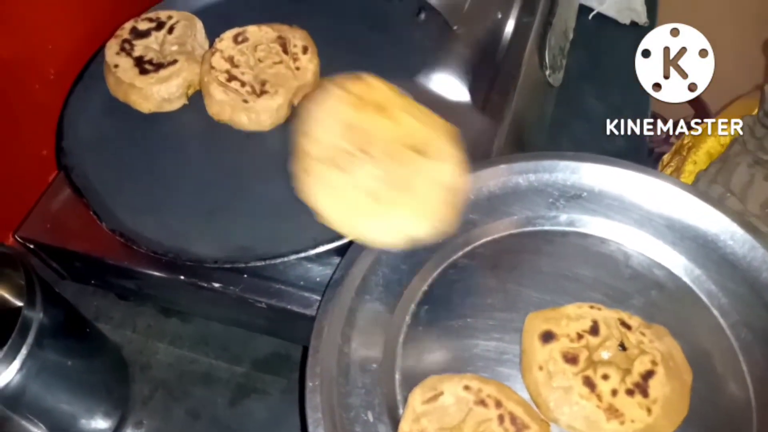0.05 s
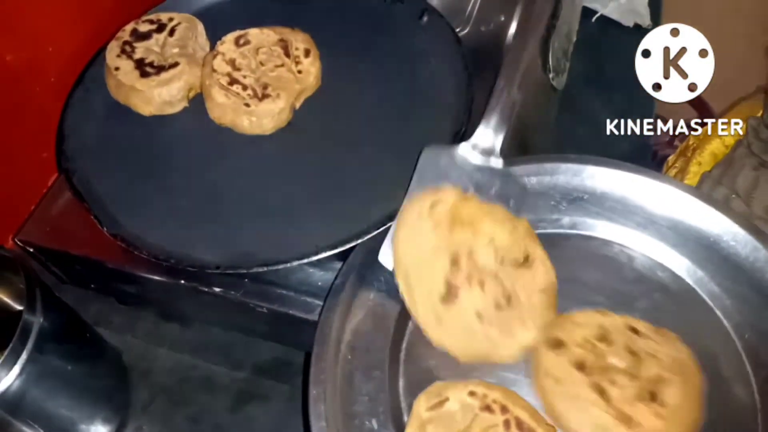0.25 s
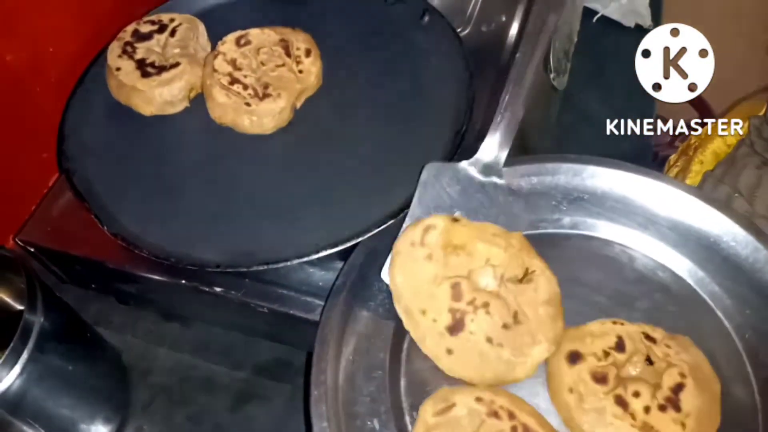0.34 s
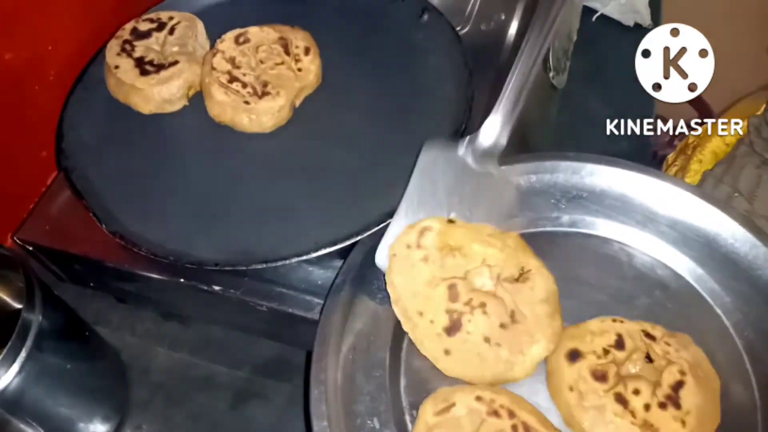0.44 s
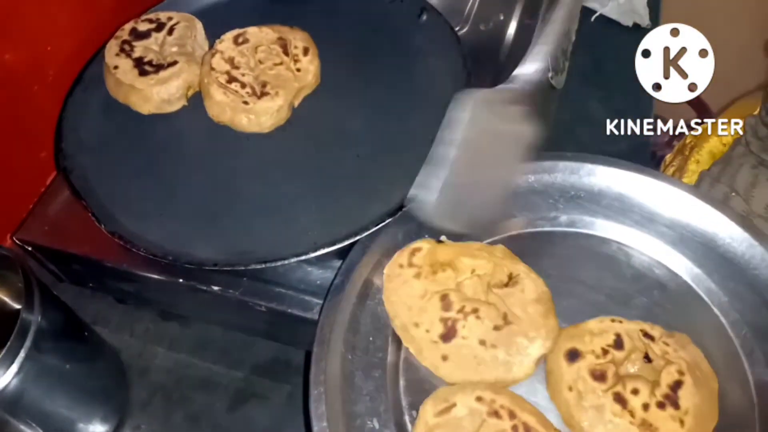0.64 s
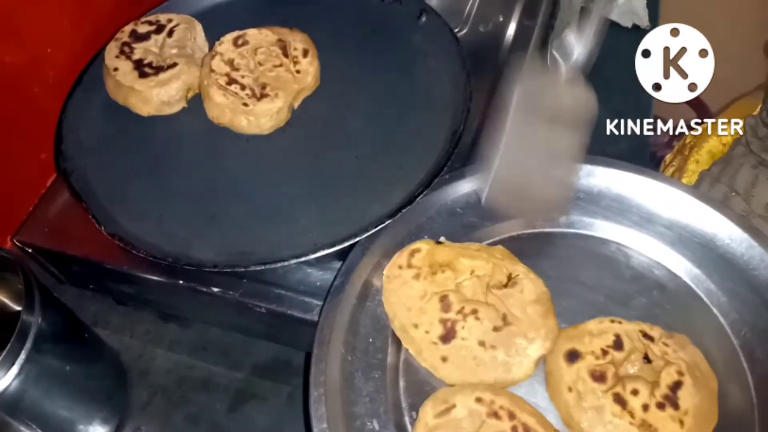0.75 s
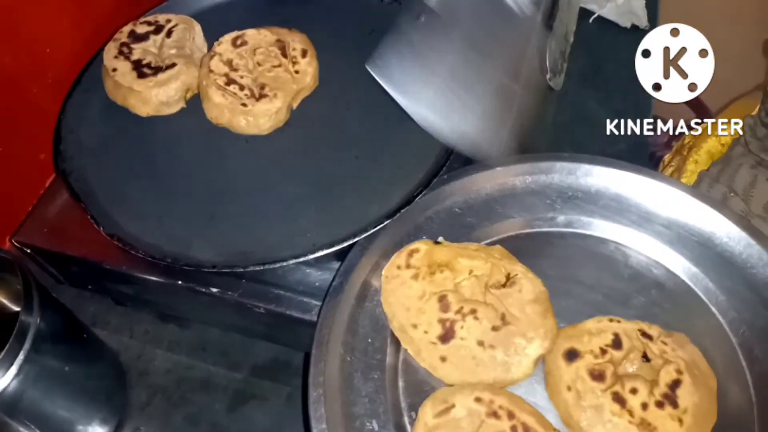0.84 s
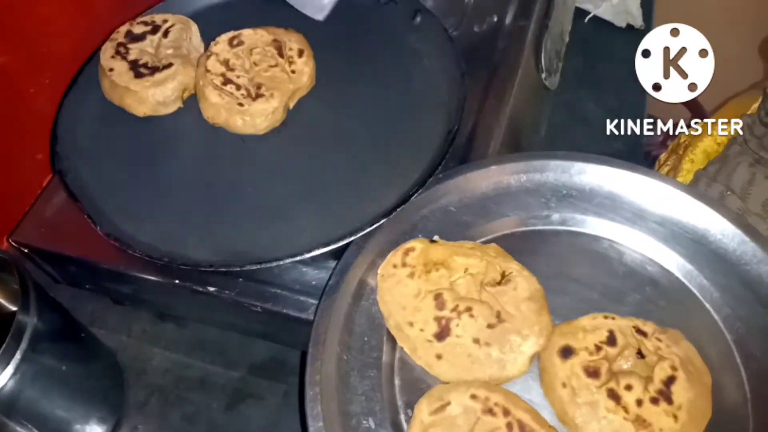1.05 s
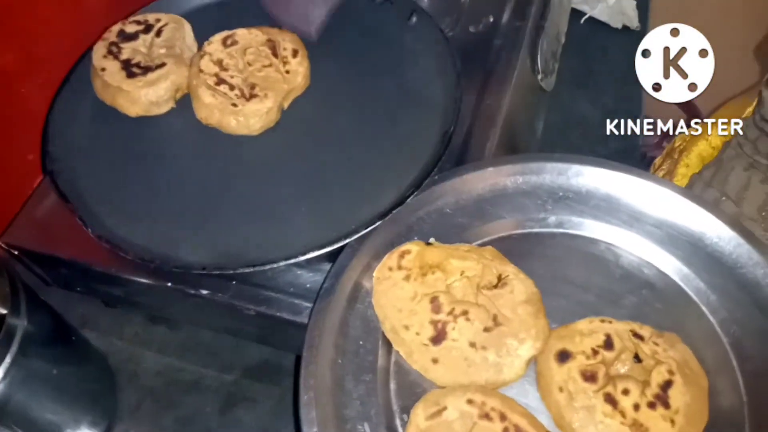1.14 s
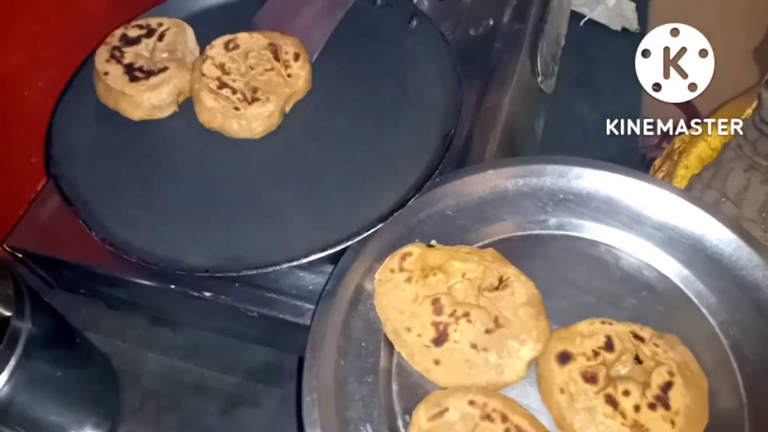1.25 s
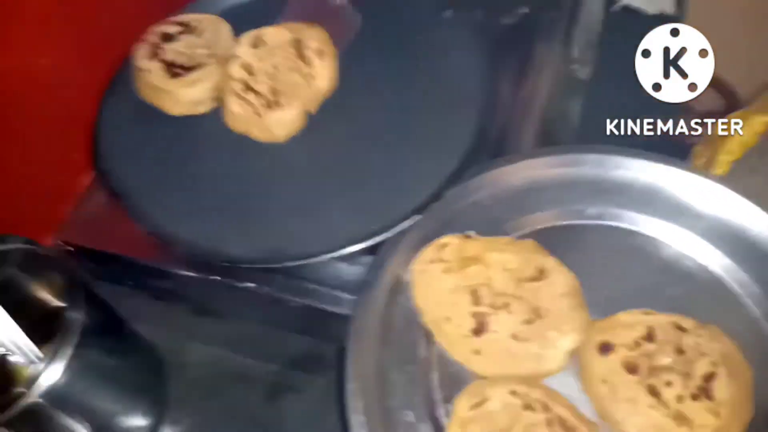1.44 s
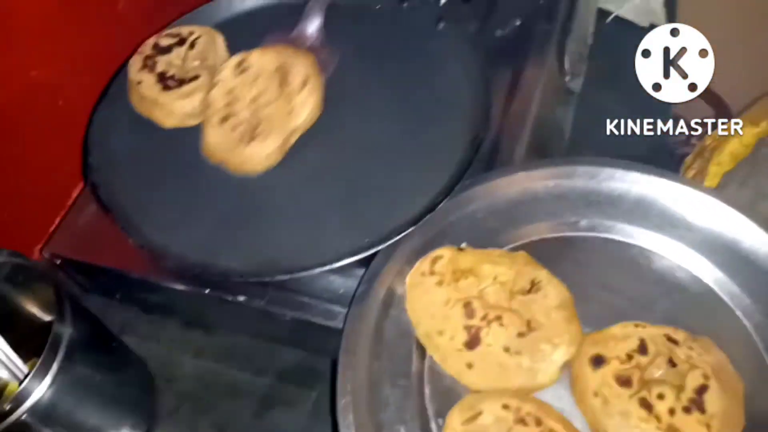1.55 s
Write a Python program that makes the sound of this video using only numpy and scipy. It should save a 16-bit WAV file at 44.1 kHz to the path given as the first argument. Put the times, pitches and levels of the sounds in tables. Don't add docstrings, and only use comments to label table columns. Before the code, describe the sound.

Close, dry kitchen sound: steel spatula and flatbread hit a thin plate with rapid clacks and small rebounds, low counter thumps beneath, a soft hand brush, then two duller griddle knocks and a short gritty slide.

```python
import sys
import numpy as np
from scipy import signal
from scipy.fft import rfft, irfft
from scipy.io import wavfile

SR = 44100
rng = np.random.default_rng(int(sys.argv[2]) if len(sys.argv) > 2 else 0)


def magnitude_from_level(level_db):
    exponent = np.asarray(level_db, float) / 20
    return 10 ** exponent


def master_out(mix):
    frames = np.transpose(np.atleast_2d(mix))
    ceiling = np.clip(frames, -1, 1)
    pcm = np.round(ceiling * 32767).astype(np.int16)
    wavfile.write(sys.argv[1], SR, pcm)


N = 70560
TIME = np.arange(N) / SR

# start_s [s], peak_db [dB], tilt_db_per_octave [dB], chatter_s [s]
EDGE_HITS = [
    (0.202, -15, 0.31, 0.012),
]
DROP_HITS = [
    (0.232, -16.5, -1, 0.011),
]
BOUNCE_HITS = [
    (0.331, -19.5, 0.084, 0.0062),
    (0.391, -38, 0.1, 0.0042),
]
RIM_HITS = [
    (0.437, -18, 0.076, 0.014),
    (0.491, -31.5, 0.14, 0.0058),
]
BLADE_HITS = [
    (0.615, -22, 0.046, 0.024),
    (0.659, -28.5, 0.14, 0.021),
]
IRON_HITS = [
    (1.244, -21.5, -0.4, 0.018),
]
LAND_HITS = [
    (1.323, -18.5, 0.23, 0.018),
]
# mode_hz [Hz], width_hz [Hz], level_db [dB]
EDGE_MODES = [(420, 47, 1), (1010, 82, -14), (1530, 230, -12.5), (2937, 81, 2), (3490, 79, -7.5),
              (3977, 110, -2), (4610, 185, -3), (5240, 60, -0.5), (6390, 65, 0.5), (6930, 58, -7),
              (8100, 55, -30), (9530, 170, -4)]
DROP_MODES = [(465, 47, -1), (500, 26, -23), (952, 50, -2), (1705, 60, -2.5), (2157, 35, -0.5),
              (2684, 46, -4), (3100, 41, 5), (3930, 37, -10), (4940, 320, -10.5), (6070, 180, -3.5),
              (6770, 72, -3)]
BOUNCE_MODES = [(520, 104, -2), (903, 11, -3), (1790, 37, -9), (2080, 23, -7), (2220, 45, -8),
                (2950, 64, -2), (3760, 64, -1), (4500, 85, -5), (5050, 100, -8), (5620, 76, -7),
                (6960, 49, -27), (7360, 22, -38)]
RIM_MODES = [(591, 46, -1), (725, 32, -2), (1250, 204, -4.5), (2002, 15, -4.5), (2474, 20, -1.5),
             (4060, 78, -5), (4335, 23, 6), (4517, 25, 5), (5480, 74, -2), (6350, 83, -4), (6970, 32, -1),
             (8000, 60, -40), (9600, 23, 0)]
BLADE_MODES = [(713, 22, -12.5), (2265, 33, -3), (2610, 58, -3), (2790, 60, -5), (2920, 67, -5),
               (3487, 23, 1.5), (4400, 70, 2), (5230, 52, 4), (6100, 270, -4.5), (6770, 38, 0),
               (9600, 60, -1.5), (10600, 300, -12.5)]
IRON_MODES = [(510, 43, -2), (987, 30, 2), (1730, 53, -8.5), (2090, 41, -6.5), (3070, 110, -1),
              (3360, 25, -22), (3660, 20, -11), (4500, 15, -27), (4450, 134, -3), (5100, 160, -11.5),
              (5600, 58, -9), (6220, 24, -17)]
LAND_MODES = [(468, 52, 2.5), (602, 107, -7.5), (960, 9.5, 5), (1823, 44, -4), (2075, 20, -5.5),
              (3003, 170, -1.5), (3580, 44, -1), (4540, 110, 1), (4900, 150, -6.5), (5550, 220, -8.5),
              (7130, 114, -7), (8900, 180, -19)]
# freq_hz [Hz], density_db [dB per Hz]
EDGE_WASH = [(120, -49.5), (200, -21.5), (1010, -24.5), (2290, -19), (2900, -5), (9310, -11),
             (15500, -26.5)]
DROP_WASH = [(120, -43), (200, -27.5), (462, -15.5), (769, -1.5), (906, -26), (1170, -1.5), (3010, -6.5),
             (6350, -12.5), (15500, -35.5)]
RIM_WASH = [(120, -59), (200, -18), (399, -48), (479, -24.5), (1840, -22), (2060, -6), (4330, -11.5),
            (4750, -13), (15500, -20.5)]
BLADE_WASH = [(120, -56), (200, -28), (702, -19), (812, -13.5), (2510, -4), (3180, -10.5), (4410, -0.5),
              (12700, -15), (15500, -18.5)]
IRON_WASH = [(120, -43), (200, -8.5), (327, -42), (534, -6.5), (677, -3), (974, -13), (2330, -10.5),
             (4660, -12.5), (15500, -23.5)]
# tail_t60_s, wash_db, modes_db, tail_under_burst_db
EDGE_BODY = (0.16, -7.5, -14, -3.5)
DROP_BODY = (0.33, -14, -14.5, 1.5)
BOUNCE_BODY = (0.33, -10, -13.5, 0)
RIM_BODY = (0.33, -8, -11, -1)
BLADE_BODY = (0.33, -9.5, -13, 0.5)
IRON_BODY = (0.33, -14.5, -12.5, 0)
LAND_BODY = (0.33, -14, -12, -2)
FIRST_TOUCH, MODE_SPREAD_DB, T60_RATIO_PER_OCTAVE, BODY_CUT_HZ = 19, 1, 0.88, 230
SOFT_CONTACT_HZ, FIRM_CONTACT_HZ = 9000, 12000

# start_s [s], pitch_hz [Hz]
THUMP_AT = [(.245, 93), (.352, 94), (.465, 92), (.24, 205), (.335, 207), (.44, 200), (1.25, 208),
            (1.02, 55), (.6, 62), (1.27, 92), (.64, 200)]
# level_db [dB], t60_s [s]
THUMPS = [(-43.5, 0.27), (-46.5, 0.73), (-49.5, 0.41), (-43, 0.12), (-45.5, 0.22), (-52, 0.36),
          (-50.5, 0.55), (-58, 0.29), (-54.5, 0.36), (-61, 0.68), (-53.5, 0.1)]
THUMP_GAIN_DB, THUMP_LONGEST_S, THUMP_RISE_CYCLES = 7, 0.45, 1.74
# start_s [s], damped_s [s], pitch_hz [Hz]
SING_AT = [(.672, .73, 7675), (.67, 1.6, 7942), (1.265, 1.325, 7671), (.66, .92, 4022), (.438, .6, 392),
           (.617, .9, 1319), (.617, .8, 694), (.617, .77, 390), (.62, .85, 1992), (.62, .81, 1010),
           (.335, .43, 3880), (.44, .61, 4340), (1.19, 1.24, 370), (.02, .08, 1340), (0, .2, 7950),
           (.3, .44, 7945), (.47, .54, 11600), (.63, .76, 11620), (.9, .95, 340), (.79, .86, 195),
           (1.246, 1.32, 947), (1.325, 1.42, 953)]
# level_db [dB], t60_s [s]
SINGS = [(-40.5, 0.28), (-61, 4.7), (-49.5, 3.2), (-55, 1.2), (-29.5, 0.29), (-48.5, 0.38), (-49, 0.25),
         (-46.5, 0.24), (-55.5, .6), (-56.5, 0.46), (-53, 0.43), (-46, 0.37), (-70, 2.7), (-71.5, 0.72),
         (-76, 4.1), (-70, 2.1), (-56, .5), (-61, .5), (-72.5, 0.33), (-74.5, 0.56), (-45, 0.7),
         (-51, 0.72)]
SING_RISE_S, SING_DAMP_S = 0.0028, 0.014

# time_s [s], level_db [dB]
SLIDE_LEVEL = [(1.37, -45.5), (1.42, -47), (1.445, -43.5), (1.5, -47), (1.55, -46.5), (1.575, -43.5),
               (1.64, -50)]
# freq_hz [Hz], level_db [dB]
SLIDE_COLOUR = [(350, -45), (600, -19.5), (2000, -14.5), (5000, -17), (9000, -26.5), (15500, -30.5)]
# mode_hz [Hz], width_hz [Hz], level_db [dB]
SLIDE_MODES = [(534.5, 53, 1.5), (970, 53, -3), (1910, 41, -15), (2675, 74, -11.5), (4000, 22, -28),
               (4526, 54, -6), (4900, 43, -9), (5550, 36, -16), (5840, 55, -15.5), (6600, 57, -29),
               (6810, 44, -9), (7060, 42, -9.5)]
SLIDE_GRAINS_PER_S, SLIDE_MODES_DB = 7000, 7
# time_s [s], level_db [dB]
LIFT_LEVEL = [(0, -74), (.045, -64), (.075, -62), (.12, -66), (.18, -73)]
# mode_hz [Hz], width_hz [Hz], level_db [dB]
LIFT_MODES = [(612, 19, 6), (510, 33, -4), (1280, 740, -18)]
# freq_hz [Hz], density_db [dB per Hz]
SWISH_COLOUR = [(88, -48), (150, -20), (347, -10), (760, -30), (1120, -27), (4500, -26), (5850, -39),
                (9900, -120)]
SWISH_S, SWISH_RISE_S, SWISH_T60_S, SWISH_DB = 0.978, 0.021, 0.25, -52
# start_s [s], peak_db [dB]
SPITS = [
    (1.3915, -28.5),
    (1.4226, -29),
]
# freq_hz [Hz], level_db [dB]
SIZZLE_COLOUR = [(30, -11), (61, -1), (200, -17.5), (450, -25), (1300, -24), (2300, -13.5), (3000, -12),
                 (3940, -6.5), (7780, -8.5), (15800, -24.5)]
SPIT_CUT_HZ, SPIT_DECAY_S, SIZZLE_DB = 11000, 0.0004, -60
# time_s [s], pitch_hz [Hz]
JET_PITCH = [(0, 10200), (.2, 10180), (.42, 9800), (.8, 9600), (1.3, 9350), (1.6, 9680)]
JET_DB, JET_WOBBLE_HZ, JET_FLICKER_DB = -65.5, 50, 2.5
# freq_hz [Hz], gain_db [dB]
MIC = [(40, -6.5), (90, -4.5), (11500, -0.29), (13000, -14), (14200, -7.5), (15000, 2), (15620, -11),
       (15720, -22)]
MIC_CUTOFF_HZ = 16780


def rms_one(x):
    return x / np.sqrt(np.mean(x ** 2) + 1e-20)


def at_hz(points, hz):
    points_hz, values = np.transpose(points)
    return np.interp(np.log(np.maximum(hz, 1)), np.log(points_hz), values)


def colour(x, spectrum):
    gain = magnitude_from_level(at_hz(spectrum, np.fft.rfftfreq(len(x), 1 / SR)))
    return irfft(rfft(x) * gain, len(x))


def high_pass(x, cut_hz):
    return signal.sosfilt(signal.butter(2, cut_hz, "high", fs=SR, output="sos"), x)


def drift(rate_hz):
    r = np.exp(-2 * np.pi * rate_hz / SR)
    return rms_one(signal.lfilter([1], [1, -2 * r, r * r], rng.standard_normal(2 * N))[N:])


def under(curve):
    s, db = np.transpose(curve)
    edge_s = [s[0] - 0.02, *s, s[-1] + 0.02]
    edge_db = [db[0] - 30, *db, db[-1] - 30]
    return magnitude_from_level(np.interp(TIME, edge_s, edge_db, -150, -150))


def ring(x, hz, t60_s):
    r = magnitude_from_level(-60 / (max(t60_s, 0.002) * SR))
    w = 2 * np.pi * hz / SR
    return signal.lfilter([0, np.sin(w)], [1, -2 * r * np.cos(w), r * r], x + 1e-18)


def resonate(x, modes, extra_db=0.0):
    hz, width_hz, db = np.transpose(modes)
    size = magnitude_from_level(db) * np.sqrt(width_hz)
    size = size / np.sqrt(np.sum(size ** 2))
    gain = size * magnitude_from_level(extra_db) * np.sqrt(4 * np.pi * width_hz / SR)
    out = 0
    for k, (f, width, g) in enumerate(zip(hz, width_hz, gain)):
        out = out + (-1) ** k * g * ring(x, f, 2.2 / width)
    return out


def knocks(hits, modes, wash, body):
    t60_s, wash_db, modes_db, tail_db = body
    t = TIME[:SR // 2]
    out = np.zeros(N + SR)
    octave = np.log2(np.array(modes)[:, 0] / 2000)
    for start_s, peak_db, tilt_db, chatter_s in hits:
        burst = np.exp(-(t / chatter_s) ** 2)
        drive = 0.93 * rng.standard_normal(len(t)) * (burst + magnitude_from_level(tail_db - 60 * t / t60_s))
        drive[0] = FIRST_TOUCH
        spread_db = MODE_SPREAD_DB * rng.standard_normal(len(modes))
        sound = resonate(drive, modes, modes_db + tilt_db * octave + spread_db)
        noise = magnitude_from_level(wash_db) * rms_one(colour(rng.standard_normal(len(t)), wash))
        for k, low_hz in enumerate(170 * 2.0 ** np.arange(7)):
            edges_hz = [low_hz, min(2 * low_hz, 20000)]
            band = signal.sosfilt(signal.butter(2, edges_hz, "band", fs=SR, output="sos"), noise)
            band_t60_s = t60_s * T60_RATIO_PER_OCTAVE ** (k - 3)
            shape = burst + magnitude_from_level(tail_db - 60 * t / band_t60_s)
            sound = sound + magnitude_from_level(tilt_db * (k - 4.5)) * band * shape
        first = int(start_s * SR)
        out[first:first + len(t)] += magnitude_from_level(peak_db) * sound
    return high_pass(out[:N], BODY_CUT_HZ)


def soft(x, cut_hz=SOFT_CONTACT_HZ):
    return signal.sosfilt(signal.butter(2, cut_hz, fs=SR, output="sos"), x)


def struck_metal():
    plate = knocks(EDGE_HITS, EDGE_MODES, EDGE_WASH, EDGE_BODY)
    plate = plate + knocks(DROP_HITS, DROP_MODES, DROP_WASH, DROP_BODY)
    bounce = soft(knocks(BOUNCE_HITS, BOUNCE_MODES, DROP_WASH, BOUNCE_BODY))
    rim = knocks(RIM_HITS, RIM_MODES, RIM_WASH, RIM_BODY)
    blade = knocks(BLADE_HITS, BLADE_MODES, BLADE_WASH, BLADE_BODY)
    iron = soft(knocks(IRON_HITS, IRON_MODES, IRON_WASH, IRON_BODY))
    land = soft(knocks(LAND_HITS, LAND_MODES, IRON_WASH, LAND_BODY), FIRM_CONTACT_HZ)
    return plate + bounce + rim + blade + iron + land


def singing():
    out = 0
    for (start_s, damped_s, hz), (db, t60_s) in zip(SING_AT, SINGS):
        t = np.maximum(TIME - start_s, 0)
        damping = np.exp(-np.maximum(TIME - damped_s, 0) / SING_DAMP_S)
        shape = (1 - np.exp(-t / SING_RISE_S)) * magnitude_from_level(-60 * t / t60_s) * damping
        out = out + magnitude_from_level(db) * shape * np.sin(2 * np.pi * hz * t)
    return out


def slide():
    hits = rng.random(N) < SLIDE_GRAINS_PER_S / SR
    grains = rms_one(hits * rng.standard_normal(N) * magnitude_from_level(1.2 * drift(60)))
    rasp = rms_one(colour(grains, SLIDE_COLOUR))
    return under(SLIDE_LEVEL) * rms_one(rasp + resonate(grains, SLIDE_MODES, SLIDE_MODES_DB))


def thumps():
    out = 0
    for (start_s, hz), (db, t60_s) in zip(THUMP_AT, THUMPS):
        t = np.maximum(TIME - start_s, 0)
        rise = 1 - np.exp(-t * hz / THUMP_RISE_CYCLES)
        decay = magnitude_from_level(-60 * t / min(t60_s, THUMP_LONGEST_S))
        out = out + magnitude_from_level(db + THUMP_GAIN_DB) * np.sin(2 * np.pi * hz * t) * rise * decay
    return out


def lift():
    return under(LIFT_LEVEL) * resonate(rng.standard_normal(N), LIFT_MODES)


def swish():
    t = np.maximum(TIME - SWISH_S, 0)
    shape = (1 - np.exp(-t / SWISH_RISE_S)) * magnitude_from_level(-60 * t / SWISH_T60_S)
    puff = rms_one(colour(rng.standard_normal(N), [(60, -50), *SWISH_COLOUR, (9000, -60)]))
    return magnitude_from_level(SWISH_DB) * shape * puff


def oil():
    shape = 0
    for start_s, db in SPITS:
        decay = np.exp(-np.maximum(TIME - start_s, 0) / SPIT_DECAY_S)
        shape = shape + magnitude_from_level(db) * (TIME > start_s) * decay
    spits = high_pass(shape * rng.standard_normal(N), SPIT_CUT_HZ)
    fizz = magnitude_from_level(SIZZLE_DB + 0.19 * drift(1.6)) * rms_one(colour(rng.standard_normal(N), SIZZLE_COLOUR))
    return fizz + spits


def jet():
    hz = np.interp(TIME, *np.transpose(JET_PITCH)) + JET_WOBBLE_HZ * drift(60)
    level = magnitude_from_level(JET_DB + JET_FLICKER_DB * drift(22))
    return level * np.sin(2 * np.pi * np.cumsum(hz) / SR)


def scene():
    utensil = struck_metal() + singing() + slide()
    background = thumps() + lift() + swish() + oil() + jet()
    return (utensil + background)[None]


def band_limit(x):
    return signal.sosfilt(signal.butter(12, 16790, fs=SR, output="sos"), x)


def record(dry):
    top_cut = signal.cheby2(12, 60, MIC_CUTOFF_HZ, fs=SR, output="sos")
    mix = signal.sosfilt(top_cut, colour(dry[0], MIC))[None]
    return band_limit(mix)


dry = scene()
out = record(dry)
master_out(out)
```